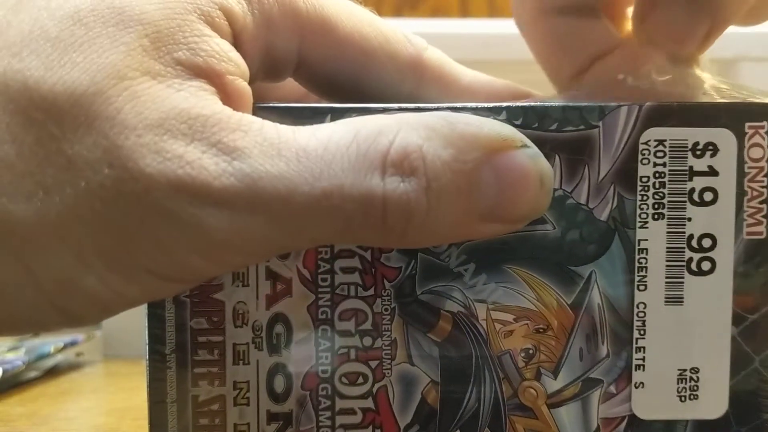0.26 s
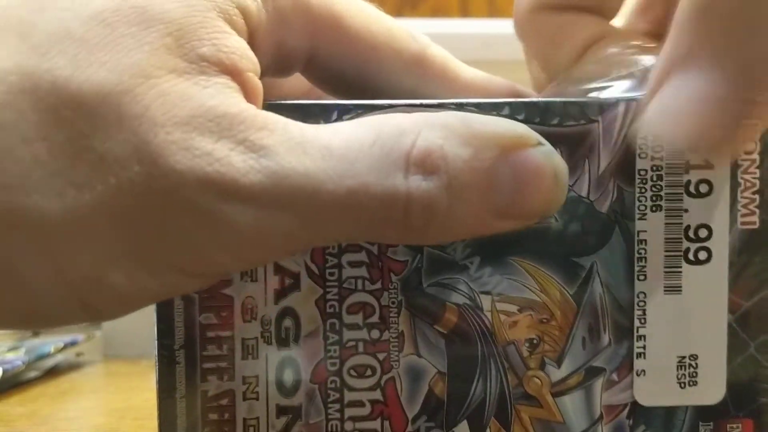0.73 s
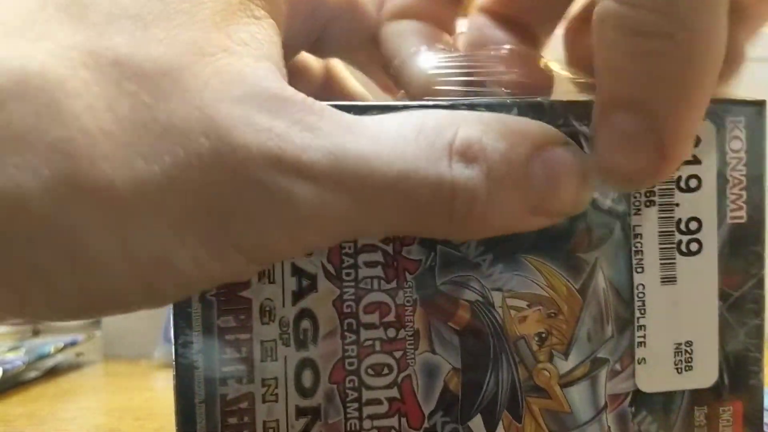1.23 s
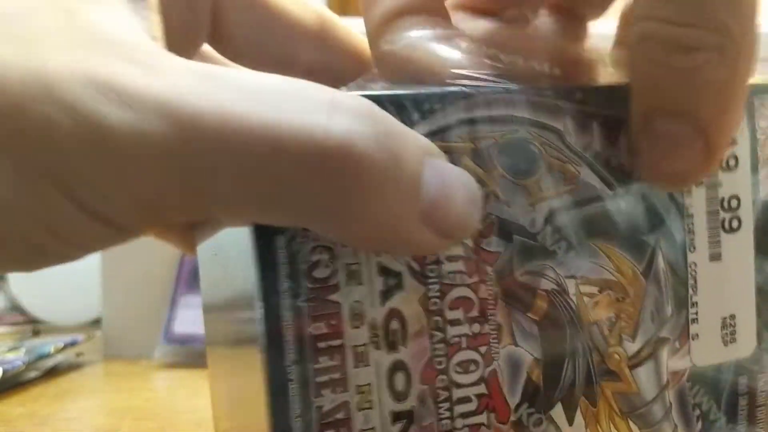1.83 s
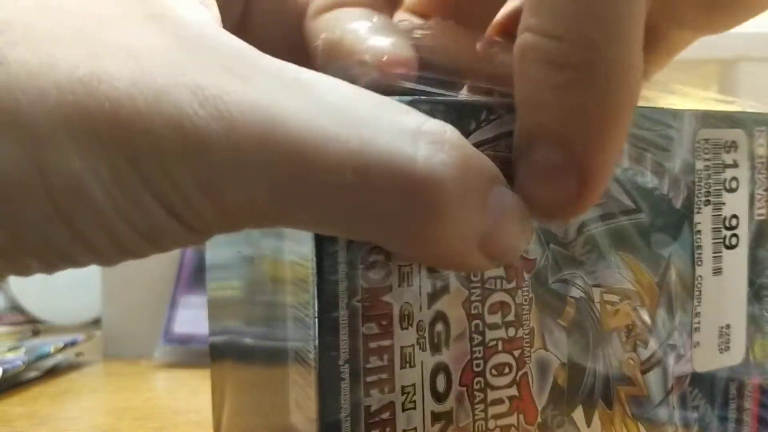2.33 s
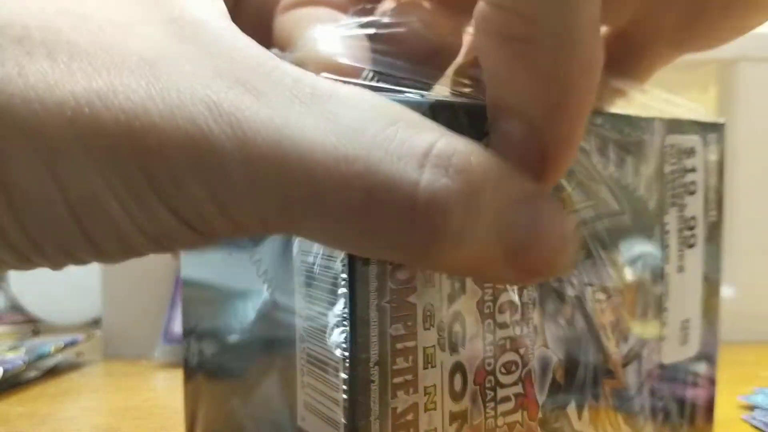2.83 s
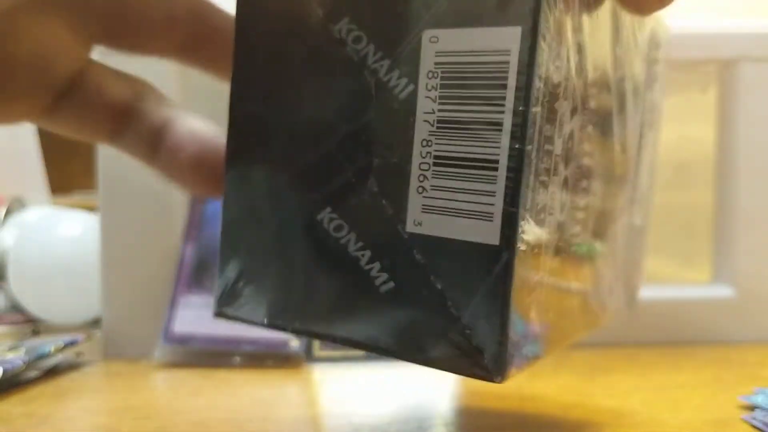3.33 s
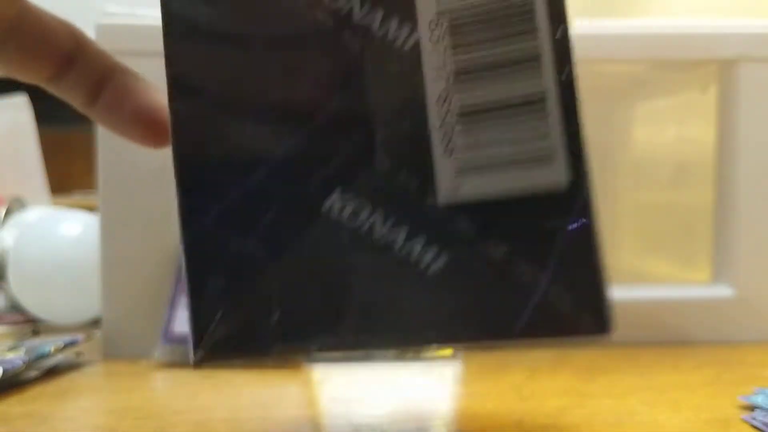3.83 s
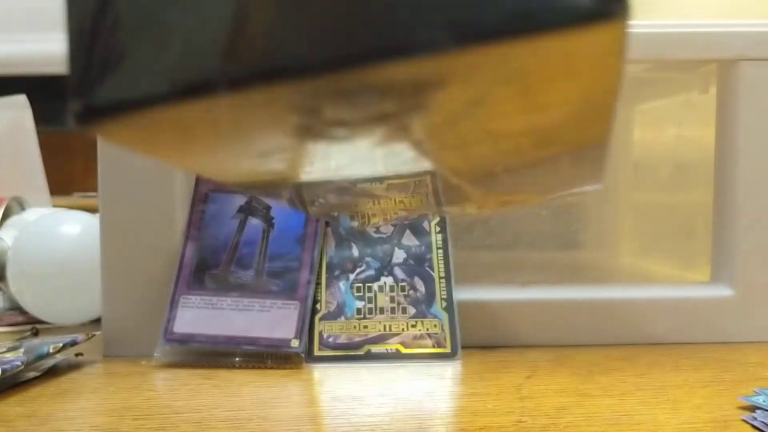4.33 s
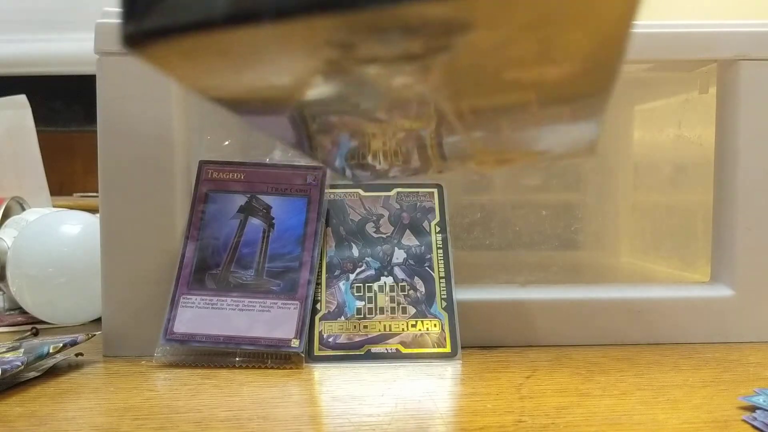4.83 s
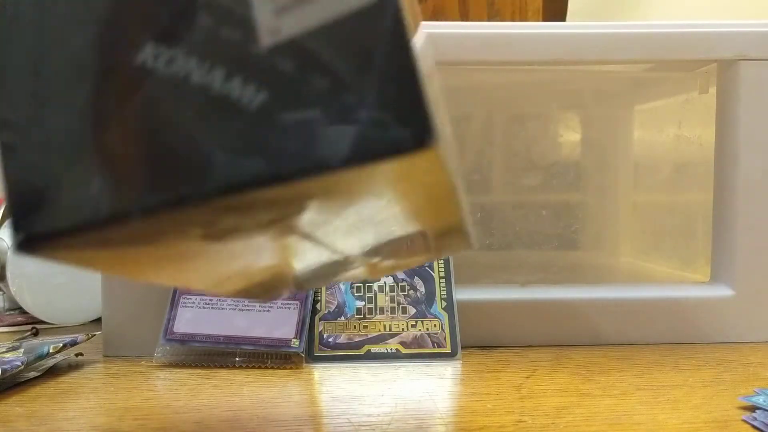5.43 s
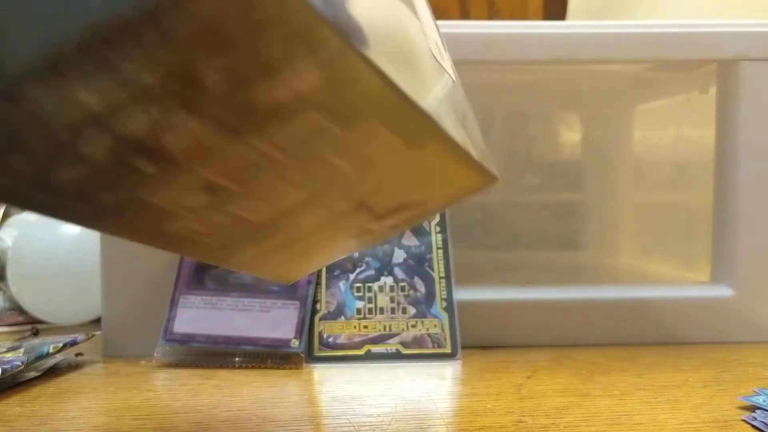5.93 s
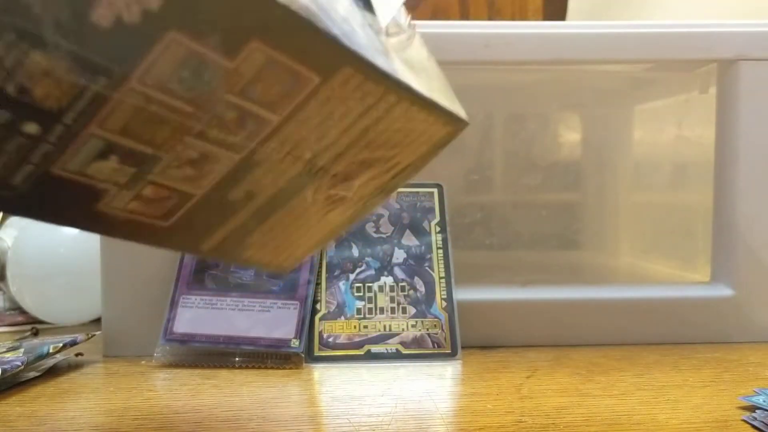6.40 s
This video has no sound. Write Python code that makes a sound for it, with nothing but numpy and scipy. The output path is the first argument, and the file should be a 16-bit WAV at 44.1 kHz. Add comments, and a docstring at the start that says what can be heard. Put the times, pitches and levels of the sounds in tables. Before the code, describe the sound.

Fingers pick at tight plastic film on a small cardboard box. Small crackles thicken into a burst of very sharp snaps just after one second, another past two, then sparser ticks and light handling. A hard bump with a crack comes around five seconds, then more crinkling. Close microphone, small quiet furnished room, faint steady low air.

```python
"""In a quiet furnished room, fingers pick, stretch and tear thin shrink film off a small cardboard box.
Snapping creases are noise bursts through film resonances, and each knocks the damped modes of the hollow box.
Between snaps, clumped random slips make film crinkle and slide and skin rub on card; the held box stirs low.
Thuds are short decaying sines, fingertips tap the box, a palm sweeps past as banded noise, and skin hums once.
A phone microphone is close by; a short room tail and steady air lie behind."""
import sys
import numpy as np
from scipy import signal
from scipy.fft import rfft, irfft
from scipy.io import wavfile

SR = 44100
rng = np.random.default_rng(int(sys.argv[2]) if len(sys.argv) > 2 else 0)


def to_wav(s):
    """Save 16-bit WAV."""
    ch = np.atleast_2d(s).T  # columns
    pcm = np.round(np.clip(ch, -1, 1) * 32767)  # PCM
    wavfile.write(sys.argv[1], SR, pcm.astype(np.int16))


N = 293706   # samples

# Levels in the tables are relative: the sources trim them further.
# Pulls and shifts of grip, each a swell; rise and fall are the times to change by 20 dB:
# peak_s, rise_s, fall_s, crinkle_db, slide_db, rub_db
PULL_SWELLS = [(0.0, .1, 0.18, -67.5, -66, -56), (0.25, 0.55, .14, -72, -66, -60),
               (0.371, 0.01, .07, -45.5, -44, -43.5), (0.55, .3, 0.1, -67.5, -66, -66),
               (0.64, .04, 0.04, -51.5, -49.5, -52.5), (0.91, 0.15, 0.16, -57, -56, -53.5),
               (1.0, 0.03, 0.07, -51, -54, -49.5), (1.13, 0.06, 0.45, -62, -62.5, -59.5),
               (1.25, 0.0654, 0.16, -46, -50.5, -46), (1.5, 0.06, 0.13, -50, -52, -46),
               (1.62, 0.3, 0.1, -72, -61, -55), (1.75, 0.23, .14, -58, -53.5, -47.5),
               (1.95, 0.25, 0.3, -56.5, -55, -45.5), (2.27, 0, .2, -70, -69, -58.5),
               (2.351, .04, 0.08, -42.5, -48, -58), (2.56, 0.15, 0.14, -53.5, -52, -50.5),
               (2.76, 0.16, 0.24, -63, -53.5, -56), (2.86, .3, 0.5, -67.5, -68, -56.5),
               (3.09, 0.18, 0.37, -60.5, -52.5, -51), (3.4, 0.94, .12, -68.5, -65, -58),
               (3.67, 0.2, 1, -74, -70.5, -61), (3.75, 0.09, 0.18, -53.5, -54.5, -50.5),
               (3.91, 0.3, 0.5, -67.5, -64, -50.5), (4.12, 0.38, .3, -64, -60.5, -56),
               (4.45, 0.26, 0.17, -62.5, -70, -55.5), (4.57, 0.25, 0.28, -72, -66.5, -68),
               (4.83, 0.14, .17, -56, -63.5, -59), (5.064, 0.07, 0.16, -45, -47.5, -40),
               (5.15, 0.13, 0.0545, -61, -56, -42), (5.31, 0.07, 0.2, -64, -61, -55),
               (5.485, 0.03, 0.2, -58.5, -73.5, -63), (5.65, .07, .1, -56, -63, -49),
               (5.73, .12, 0.1, -55.5, -57, -58), (5.8, 0.17, .08, -56, -54.5, -51),
               (5.94, 0.06, .2, -55.5, -55.5, -46.5), (6.11, .2, 0.35, -52.5, -53, -46.5),
               (6.38, .5, 0.6, -59, -65, -66), (6.5, 0.14, 0.2, -60, -68, -50.5)]
# Low stirring of the held box, a level curve: time_s, level_db
STIR_CURVE = [(0.0, -68.5), (0.62, -62), (0.77, -71.5), (1.22, -55.5), (1.42, -59), (1.67, -49.5),
              (2.0, -68), (2.22, -70), (2.34, -60.5), (3.58, -65), (4.15, -60), (4.54, -75), (5.02, -64),
              (5.09, -47), (5.2, -64), (5.88, -62), (6.04, -46.5), (6.21, -62), (6.66, -64.5)]
# Steady air of the room, spectral density: frequency_hz, level_db (per Hz)
AIR_SPECTRUM = [(18, -20), (30, 11.5), (86, 10.5), (319, -3.5), (666, -1.5), (1760, -22), (8520, -24),
                (11100, -32), (16000, -23)]
# Snapping creases; length is four times the rise of the burst, dull and box levels are above the bright one:
# start_s, length_ms, bright_db, centre_hz, dull_db, box_db
FILM_SNAPS = [(.1764,1.4,-41.5,5500,-9,-9),(.3446,2.2,-37,7600,-2,-10),(.3504,6.5,-41,6500,3.5,11),
              (.3755,4,-28.5,5370,-9,2.5),(.3799,3.2,-37,5700,6,12.5),(.3997,0.97,-35.5,4850,-4,-4.5),
              (0.5462,1.7,-50,5970,-3,-17),(.5626,3.6,-49,5700,-5,-9),(.5893,1.9,-44,5450,2,-3),
              (.6214,2.9,-45.5,5630,4.5,4),(.6561,7.6,-42.5,5560,-10,-6),(0.6921,1.9,-49.5,4760,-2,-23),(0.7687,2.9,-45.5,5400,-4.5,-4),
              (0.8124,1.6,-42,5160,-5,-.5),(.8278,2.8,-43.5,6000,-2,-5),(0.8565,2.8,-43.5,4940,-17,-5),
              (.8754,2,-41,5600,-9,-3),(.8942,2.1,-43.5,5700,-0.5,4),(.937,1.6,-40,4800,2.5,-1),(0.9603,3.1,-51,5000,5.5,-9),
              (.979,2.5,-32,6230,-14,-12),(1.0085,2.9,-40,6750,-22,-18),(1.0555,3.6,-48.5,6260,-9,0),
              (1.0902,0.65,-22,6850,-9,-15),(1.1352,4.2,-36.5,8100,-11,-8),(1.1835,2.1,-19.5,5300,-7,-8.5),
              (1.2235,4.8,-31.5,6100,-.5,-10),(1.2302,6.9,-28.5,6200,-1,8.5),(1.238,1.7,-14.5,5960,-21,-19.5),
              (1.246,2.8,-29,5900,-4,-7),(1.2558,2.3,-21.5,6800,-10.5,-14),(1.2977,2.6,-26,7900,-7.5,-13.5),
              (1.3506,7.3,-50.5,5800,0,8),(1.4746,3.2,-30.5,6600,-27,-13),(1.4854,3.6,-41,5760,-1.5,10),
              (1.5143,2.8,-37,5600,2.5,-10.5),(1.5401,5.7,-37,7540,-30,-4),(1.5567,2.7,-24,5700,5,3.5),
              (1.655,1.9,-44,6200,-4,14.5),(1.7783,2.7,-36.5,6440,-8.5,-7),(1.7928,2,-32.5,5460,-4,-9),
              (1.8393,1.3,-41,6000,-7,-18),(1.8453,3.3,-40.5,5660,-4.5,-8),(1.8743,4.5,-43,6500,-11,7.5),
              (1.9031,2.5,-29.5,6200,-1.5,7.5),(2.0515,1.1,-31.5,5850,5,-10.5),(2.1391,2.3,-52,5330,7,20.5),
              (2.3021,7.2,-33,7100,-9.5,5),(2.3325,3,-25.5,6900,-17,-9),(2.3369,4.2,-19,6600,-8.5,-10.5),
              (2.3431,4.5,-19.5,6160,-8.5,-10.5),(2.3588,4.6,-26.5,6740,-2,-8),(2.3844,2.5,-51,5800,9,21),
              (2.4992,8.7,-53,5530,2.5,14),(2.549,4.7,-34.5,6960,-5,1.5),(2.5763,5.1,-29.5,6860,-6,-1.5),
              (2.5836,1.8,-30.5,5370,-5,-7),(2.6058,1.8,-36,5760,-12,-5),(2.6104,2.5,-52,6400,7,6),(2.6396,2.5,-44,5460,2,-5),
              (2.6537,1.5,-28,7400,-23,-35),(2.6715,2.3,-43,5500,-0.5,-7),(2.735,3.1,-34.5,6740,-22,-12),
              (2.7552,3.7,-33.5,6150,3.5,-1),(2.7735,1.2,-29.5,7240,-18,-30),(2.897,2.7,-31.5,5900,-4,-10.5),
              (2.9029,2.2,-35,6900,-2,-9),(3.0017,2.1,-34,6840,-11,-33),(3.078,4.6,-36.5,6160,-4.5,2.5),
              (3.1113,1.3,-35,5100,-10,-10),(3.1476,3,-49.5,5100,4.5,0.5),(3.4101,4,-49.5,6750,2,14.5),
              (3.498,1.8,-48,7300,-9,-17),(3.8222,6,-41,6000,-4,14.5),(3.9729,2,-38,7100,-13,-7),
              (4.055,4.9,-40,6700,-8,-7),(4.0857,7.3,-55,6230,7,20),(4.1191,1.18,-18,7100,-7.5,-30),(4.1766,4.7,-50.5,6100,1,15),
              (4.2711,1.8,-41,7840,-17,-29),(4.2789,1.7,-46.5,6700,-1,-9),(4.4373,2.7,-35.5,7500,-10,-13.5),
              (4.4961,1.4,-41.5,7540,-21,-7),(4.549,0.97,-28.5,8300,-33,-33),(4.6115,2.7,-37.5,7600,-6.5,-15),
              (4.6242,2.3,-40,5600,-7,-2),(4.6669,3,-51.5,6640,3,1.5),(4.8147,4.7,-40,7800,-30,-29.5),
              (4.8549,2.1,-28,8100,-29.5,-29),(4.903,1.84,-31,7950,-16,-18.5),(5.0105,4.9,-46.5,7300,3,11),
              (5.038,3.5,-35.5,6100,7.5,6.5),(5.0466,5.5,-26,7350,-21,-7),(5.0627,1.7,-15.5,6600,-2.5,-5.5),
              (5.1394,4.5,-47,6800,-10,11),(5.154,6.8,-40,6660,-6,8),(5.2134,11,-48.5,7300,-2,4),
              (5.2541,1.6,-44,7300,-20,-8),(5.397,2.7,-53.5,5300,-2,-7),(5.5289,1.4,-44,6340,-11,-13),(5.5835,2.8,-42,8440,-25,-21.5),
              (5.6055,2.3,-39.5,6800,-8,0.5),(5.6351,5.4,-42,6700,4,7.5),(5.7288,3,-38.5,6950,-13,-19),
              (5.7405,2.2,-36,6900,-9,-25),(5.7936,2.7,-36.5,7800,-1.5,-3),(5.8452,1.7,-48.5,7200,-2,-1),
              (5.8966,3.8,-35.5,8400,-9,-17),(5.9171,7.6,-44,6340,1.5,0),(5.938,2.9,-55.5,5040,9,21),
              (5.9933,2.8,-47,7800,-12,4),(6.0652,3.4,-39,7500,-14,-11),(6.085,3.7,-33.5,7000,-16,-2),
              (6.1286,2.2,-44.5,6300,-2,12),(6.1554,1.9,-30,6550,-10,-24),(6.1882,13,-42.5,8000,-21,-13),
              (6.2503,2.8,-20.5,8000,-18.5,-11.5),(6.2869,2.9,-40.5,6300,-4,-26),(6.378,2.4,-36,6900,-28,-32),
              (6.4111,1.7,-38,8050,-21,-21),(6.434,3,-26.5,6560,-9.5,-6),(6.4884,2,-30,5400,-4,-4),
              (6.5588,4.8,-40.5,6600,-11,-26),(6.5771,5.5,-42,7100,-9.5,-12)]
# Bumps of the box against fingers and table: start_s, level_db, pitch_hz
BOX_THUDS = [(0.374, -41, 237), (0.592, -38, 170), (1.181, -41, 73), (1.183, -26, 273), (1.23, -33, 238),
             (1.291, -36.5, 253), (1.338, -34.5, 109), (1.337, -32, 203), (1.485, -40, 188),
             (1.555, -47, 95), (1.558, -42, 219), (1.642, -37, 196), (1.647, -27, 77), (1.903, -43, 262),
             (2.303, -42, 193), (2.337, -43.5, 173), (2.376, -42, 99), (2.377, -39, 166), (3.822, -45, 196),
             (4.13, -38, 211), (5.062, -18, 266), (5.064, -27, 74.5), (5.068, -23, 430),
             (5.075, -26.5, 230), (5.14, -40, 174), (5.15, -45, 106), (5.794, -38, 212), (5.933, -40, 190),
             (6.009, -32, 181), (6.249, -39, 242), (6.329, -40, 83)]
# Fingertips landing on the box: start_s, level_db
FINGER_TAPS = [(0.5091, -52.5), (1.3377, -40.5), (1.3631, -43.5), (1.4342, -42), (1.9646, -51),
               (4.5995, -39.5), (4.7672, -43.5), (4.8195, -48.5), (4.8413, -45.5), (4.8558, -40),
               (4.9344, -46), (5.2948, -42), (5.351, -47), (5.4506, -45), (5.5125, -50)]
# Skin dragging with a gliding hum: start_s, length_s, from_hz, to_hz, level_db
SKIN_SQUEAKS = [(5.388, 0.089, 215, 430, -53.5)]
# Modes of the hollow box: frequency_hz, level_db, t60_s
BOX_MODES = [(285, -12, 0.076), (443, -4.5, 0.039), (595, 2.5, 0.032), (688, 3.5, 0.032), (927, 3, 0.025),
             (1071, 3, 0.027), (1345, 10, 0.012)]
# Broad resonances, each a pair of filters whose widths are multiples of the nominal one:
# frequency_hz, width_hz, level_db
# stretched film with table echo, lower part
DULL_MODES = [(1986, 1110, 1.5), (2960, 750, 1.5), (3750, 650, -1)]
# the same film, upper part
BRIGHT_MODES = [(5086, 1280, -3), (6200, 360, -2.5), (7080, 500, -1), (8204, 1300, -1), (14000, 2100, -47)]
# skin on card
RUB_MODES = [(408, 323, -4), (707, 412, -2), (1300, 740, -26)]
# palm along film
SWISH_MODES = [(1380, 290, 1), (2100, 380, -6.5), (3320, 220, -7)]

REST_DB = -80              # floor under the pulls: hands still
AIR_DB = -65
ROOM_T60_S, ROOM_DB = 0.091, -14.5
HOLLOW_HZ = 600            # air inside the box; soft taps lose level away from it
TAP_SOFTNESS_DB = 23       # half of this is lost per octave from HOLLOW_HZ
SWISH_S, SWISH_LENGTH_S, SWISH_DB = 3.68, 0.44, -53
CUTOFF_HZ = 16750          # stopband edge


def from_db(db):
    """Amplitude ratio: 20 dB is a factor of ten."""
    return 10 ** (np.asarray(db) / 20)


def rms_one(x):
    """Normalization to unit mean power."""
    return x / np.sqrt(np.mean(x ** 2) + 1e-20)


def drift(rate_hz):
    """Slow random motion: noise smoothed by two equal one-pole low-passes, spread 1."""
    r = np.exp(-2 * np.pi * rate_hz / SR)
    noise = rng.standard_normal(N + SR)
    return rms_one(signal.lfilter([1], [1, -2 * r, r * r], noise)[SR:])   # without the first second, to settle


def peak(x, hz, width_hz):
    """Damped resonance: a two-pole band-pass with gain 1 on top."""
    r = np.exp(-np.pi * width_hz / SR)
    poles = [1, -2 * r * np.cos(2 * np.pi * hz / SR), r * r]
    return signal.lfilter((1 - r * r) / 2 * np.array([1, 0, -1]), poles, x)


def ring(x, hz, t60_s):
    """Modal impulse response: a unit click starts a decaying sine of initial height 1."""
    r, w = from_db(-60 / (t60_s * SR)), 2 * np.pi * hz / SR
    return signal.lfilter([0, np.sin(w)], [1, -2 * r * np.cos(w), r * r], x + 1e-18)


def random_signs():
    """Random polarity: each sample is independently kept or inverted."""
    return rng.choice([-1, 1], N)


def pulls():
    """Addition of powers: the swells of all pulls give crinkle, slide and rub levels in dB."""
    t = np.arange(0, N, 32) / SR
    power = from_db(2 * REST_DB) + np.zeros((3, 1))   # doubled dB turns amplitude into power
    for s, rise_s, fall_s, *top_db in PULL_SWELLS:
        drop_db = 20 * np.maximum((s - t) / rise_s, (t - s) / fall_s)   # a rise of 0 starts at once
        power = power + from_db(2 * (np.array(top_db)[:, None] - drop_db))
    return [np.interp(np.arange(N) / SR, t, 10 * np.log10(p)) for p in power]


def grains(per_s, spread_db, clump_db):
    """Stick-slip as a random point process: tiny slips of uneven size, at a rate that drifts into clumps."""
    sizes = from_db(spread_db * np.minimum(rng.exponential(1, N), 5)) * random_signs()
    luck = rng.random(N)
    chance = per_s * from_db(clump_db * drift(25)) / SR
    return sizes * (luck < chance)


def contact(x, modes, shift_db=2.5):
    """Excitation of broad resonances, whose levels drift as the contact moves."""
    out = 0
    for hz, width_hz, mode_db in modes:
        slips = x * random_signs()   # each slip starts each resonance in a direction of its own
        band = peak(peak(slips, hz, 2.64 * width_hz), hz, 1.76 * width_hz)
        out = out + from_db(mode_db + shift_db * drift(20.0)) * band
    return rms_one(out)


def film_slips(crinkle_db, slide_db):
    """Creasing and friction of film: shared sparse ticks, with dense grains for each of the two colours."""
    ticks = from_db(5.5) * grains(per_s=110, spread_db=4.5, clump_db=5.5)
    crinkle = contact(ticks + grains(per_s=5000, spread_db=1.0, clump_db=4.5), BRIGHT_MODES)
    slide = contact(ticks + grains(per_s=5000, spread_db=-0.5, clump_db=5.5), DULL_MODES)
    return from_db(crinkle_db) * crinkle + from_db(slide_db) * slide


def skin_rub(rub_db):
    """Stick-slip of skin on card: its catches sound directly and drive the box modes."""
    catches = grains(per_s=3200, spread_db=3.0, clump_db=5.0)
    hollow = sum(from_db(level_db) * ring(catches, hz, t60_s) for hz, level_db, t60_s in BOX_MODES)
    rub = contact(catches, RUB_MODES) + from_db(-8.5) * rms_one(hollow)
    return from_db(rub_db) * rms_one(rub)


def stir():
    """Low-frequency handling noise: a band of noise follows a slow level curve with random drift."""
    band = signal.butter(2, [45, 230], "band", fs=SR, output="sos")
    low = rms_one(signal.sosfilt(band, rng.standard_normal(N)))
    s, curve_db = np.transpose(STIR_CURVE)
    level_db = np.interp(np.arange(N) / SR, s, curve_db) + 4.6 * drift(6.8)
    return from_db(level_db) * low


def handling():
    """Superposition: film slips, skin rub and stirring of the held box."""
    crinkle_db, slide_db, rub_db = pulls()
    return film_slips(crinkle_db, slide_db) + skin_rub(rub_db) + stir()


def room_air():
    """Stationary background noise: white noise shaped by a spectrum, interpolated on log frequency."""
    hz, level_db = np.transpose(AIR_SPECTRUM)
    bins_hz = np.fft.rfftfreq(N, 1 / SR) + 1   # keeps the logarithm finite
    gain = from_db(np.interp(np.log(bins_hz), np.log(hz), level_db))
    return from_db(AIR_DB) * rms_one(irfft(rfft(rng.standard_normal(N)) * gain, N))


def room(x):
    """Reverberation: convolution with a dense decaying noise tail, dulled by soft furnishing."""
    t = np.arange(SR // 2) / SR
    onset = np.clip(t / 0.0011, 0, 1)   # echoes build up as the nearest surfaces answer
    tail = rng.standard_normal(len(t)) * from_db(-60 * t / ROOM_T60_S) * onset
    tail = signal.lfilter([1], [1, -.2], tail)
    return signal.fftconvolve(x, tail / np.sqrt(np.sum(tail ** 2)))[:N]


def cracks(times, length_ms, level_db, modes):
    """Sudden release of strain: a noise burst swells and dies in each resonance (a column of level_db)."""
    step = np.arange(SR // 40)
    age = step / (.25 * length_ms[:, None] * SR / 1000)
    shape = age * np.exp(1 - age)   # reaches 1 at a quarter of the length
    at = (times[:, None] * SR).astype(int) + step
    out = 0
    for k, (hz, width_hz, mode_db) in enumerate(modes):
        heights = shape * from_db(level_db[:, k:k + 1] + mode_db)
        burst = np.bincount(at.ravel(), heights.ravel(), N + SR)[:N]
        noise = (burst + 1e-18) * random_signs()
        out = out + peak(peak(noise, hz, 2 * width_hz), hz, width_hz)
    return out


def clicks(times, gains):
    """Impulsive force: one single-sample impulse for each event."""
    out = np.zeros(N)
    np.add.at(out, np.minimum((np.asarray(times) * SR).astype(int), N - 1), gains)
    return out


def knocks(times, level_db, softness_db):
    """Modal excitation of the box: a soft knock moves mostly the air inside."""
    luck = rng.standard_normal((len(times), len(BOX_MODES), 2))
    direction = np.sign(luck[:, 0, 1])   # in or out, by chance
    out = 0
    for k, (hz, mode_db, t60_s) in enumerate(BOX_MODES):
        off_db = 0.5 * np.maximum(softness_db, 0) * abs(np.log2(hz / HOLLOW_HZ))
        gains = from_db(level_db + mode_db - off_db + 2.64 * luck[:, k, 0])
        signs = direction * (-1) ** k   # neighbouring modes start opposed
        out = out + ring(clicks(times, gains * signs), hz, t60_s)
    return signal.lfilter([.15], [1, -.85], out)   # the card yields softly


def snaps():
    """Crease snapping: bright and dull cracks of the film, and the knock each gives the box."""
    s, length_ms, bright_db, centre_hz, dull_db, box_db = np.transpose(FILM_SNAPS)
    # a higher centre favours the upper bright resonances
    octaves_up = np.log2(np.array(BRIGHT_MODES)[:, 0] / 6800)
    tilt_db = 52.6 * np.outer(np.log2(centre_hz / 6800), octaves_up)
    scatter_db = 1.4 * rng.standard_normal((len(s), len(DULL_MODES)))
    bright = cracks(s, length_ms, bright_db[:, None] + 6.5 + tilt_db, BRIGHT_MODES)
    dull = cracks(s, length_ms, (bright_db + dull_db)[:, None] + 9 + scatter_db, DULL_MODES)
    # a box ring strong beside its crack counts as a soft knock
    return bright + dull + knocks(s, bright_db + box_db - 5.0, box_db)


def thuds():
    """Heavily damped oscillation: soft low sines that die within a few cycles."""
    out = np.zeros(N + SR)
    t = np.arange(SR // 4) / SR
    for s, level_db, hz in BOX_THUDS:
        shape = (1 - np.exp(-t * hz / 0.19)) * from_db(-60 * t * hz / 6.9)   # 60 dB down in 6.9 cycles
        start = int(s * SR)
        out[start:start + len(t)] += from_db(level_db + 2.5) * shape * np.sin(2 * np.pi * hz * t)
    return out[:N]


def taps():
    """Soft impact: fingertips excite the box mainly near its air resonance."""
    s, level_db = np.transpose(FINGER_TAPS)
    return knocks(s, level_db, TAP_SOFTNESS_DB)


def swish():
    """Sliding-friction noise: a palm sweep is smooth noise in a few bands, swelling and fading once."""
    along = np.clip((np.arange(N) / SR - SWISH_S) / SWISH_LENGTH_S, 0, 1)
    return from_db(SWISH_DB) * np.sin(np.pi * along) * contact(rng.standard_normal(N), SWISH_MODES)


def squeaks():
    """Frictional tone of dragging skin: a short sine whose phase sums a gliding frequency."""
    out = np.zeros(N)
    for s, length_s, from_hz, to_hz, level_db in SKIN_SQUEAKS:
        count, start = int(length_s * SR), int(s * SR)
        turns = np.cumsum(np.linspace(from_hz, to_hz, count)) / SR
        out[start:start + count] += from_db(level_db) * np.hanning(count) * np.sin(2 * np.pi * turns)
    return out


def scene():
    """Superposition of direct sound, room tail and air; the thuds add no tail."""
    near = snaps() + taps() + handling() + squeaks() + swish()
    return (near + thuds() + from_db(ROOM_DB) * room(near) + room_air())[None]


def record(dry):
    """Band limitation: the microphone drops the deepest bass, and the top is cut."""
    x = signal.sosfilt(signal.butter(6, 42, "high", fs=SR, output="sos"), dry)
    return signal.sosfilt(signal.cheby2(14, 50, CUTOFF_HZ, fs=SR, output="sos"), x)


dry = scene()
out = record(dry)
to_wav(out)
```